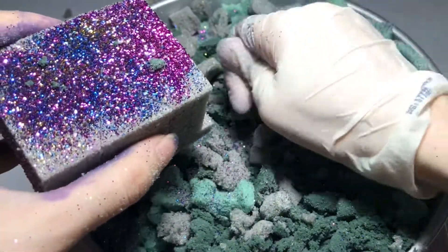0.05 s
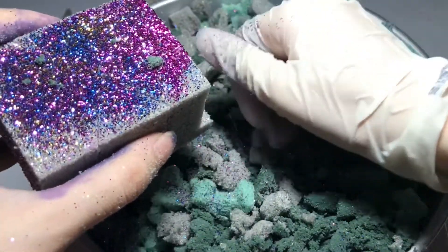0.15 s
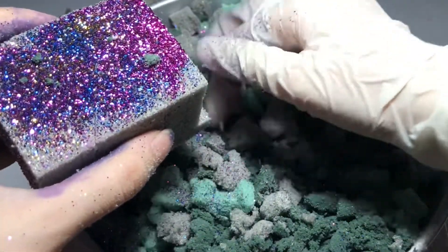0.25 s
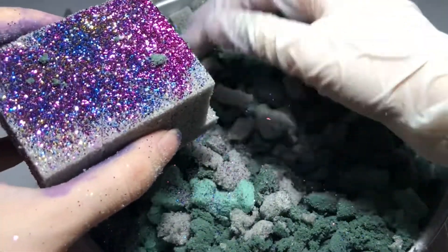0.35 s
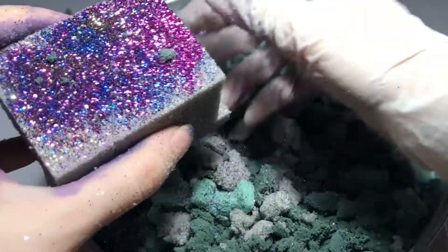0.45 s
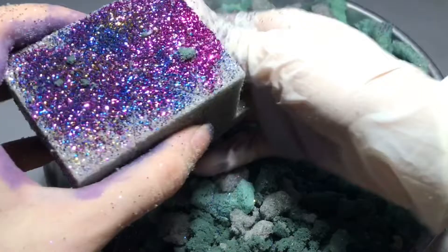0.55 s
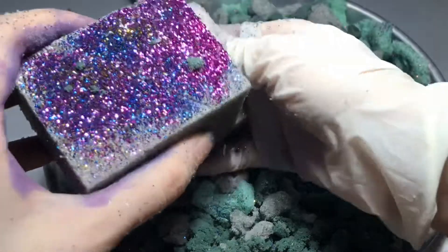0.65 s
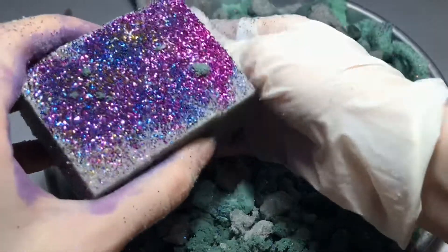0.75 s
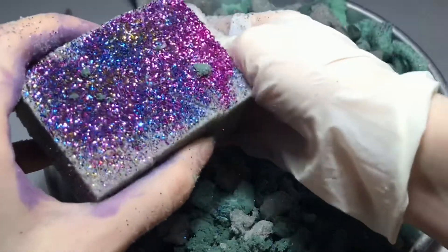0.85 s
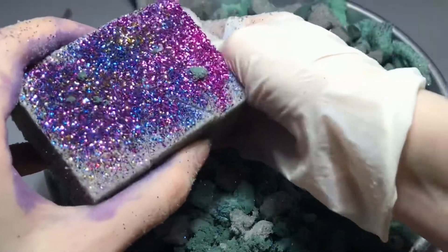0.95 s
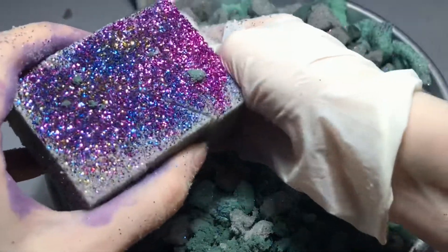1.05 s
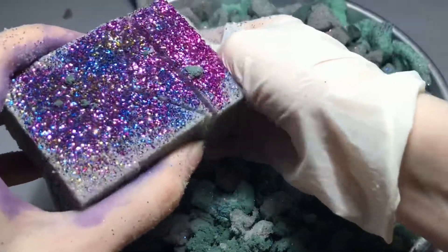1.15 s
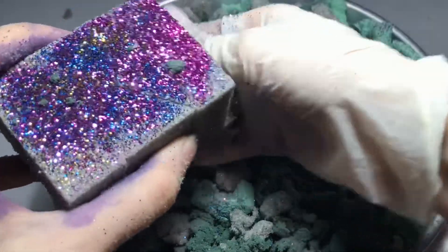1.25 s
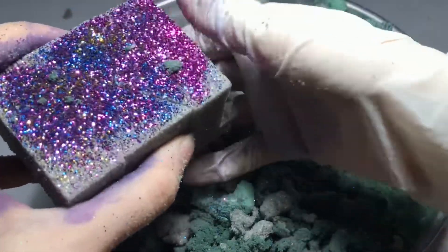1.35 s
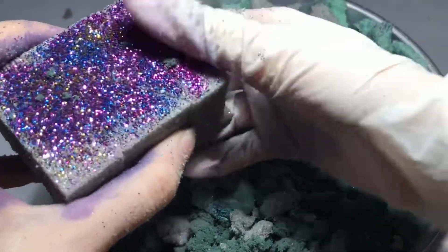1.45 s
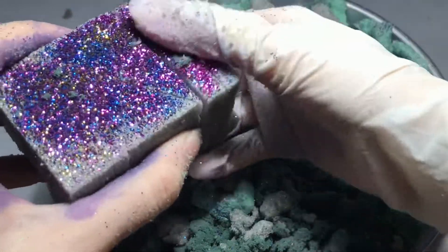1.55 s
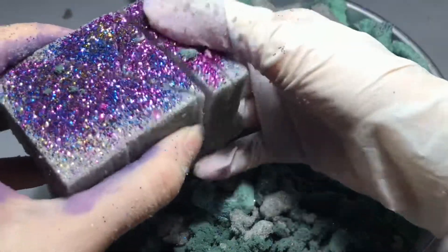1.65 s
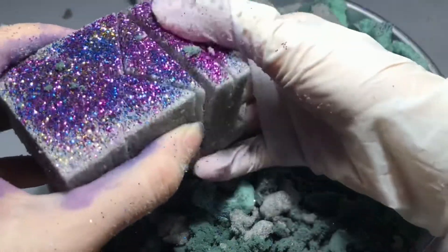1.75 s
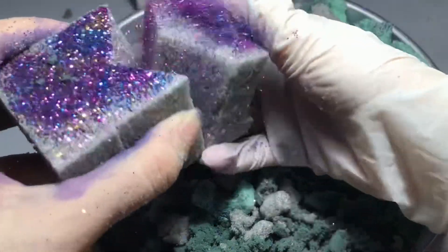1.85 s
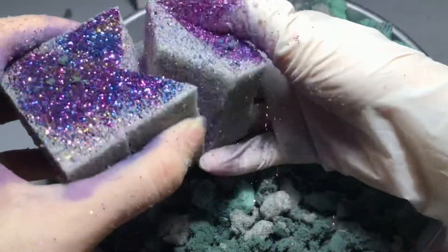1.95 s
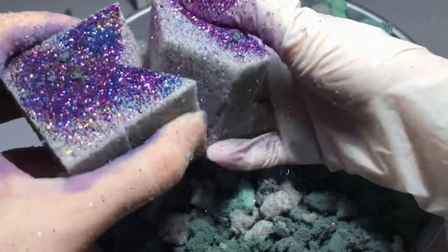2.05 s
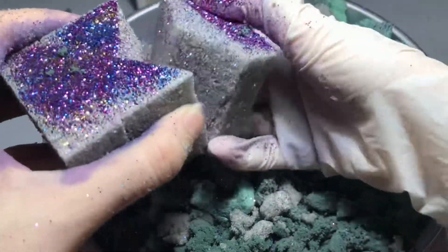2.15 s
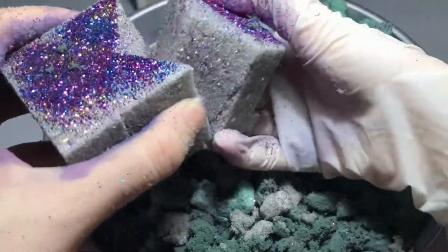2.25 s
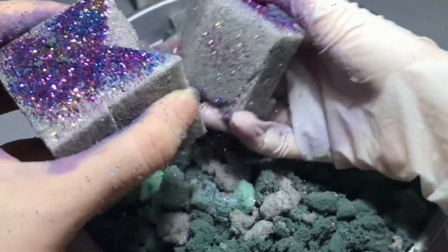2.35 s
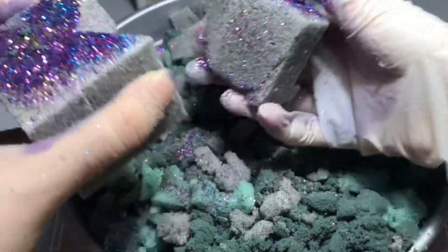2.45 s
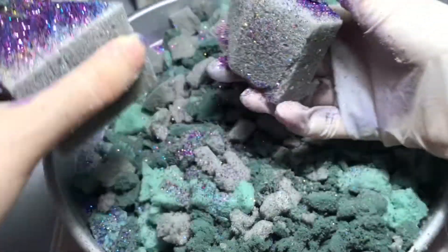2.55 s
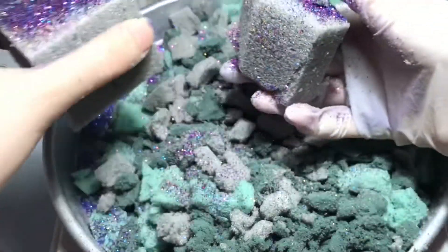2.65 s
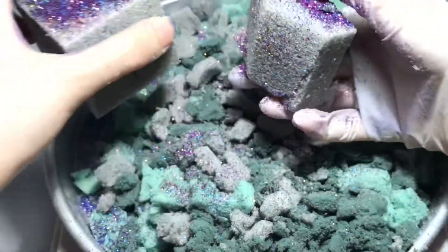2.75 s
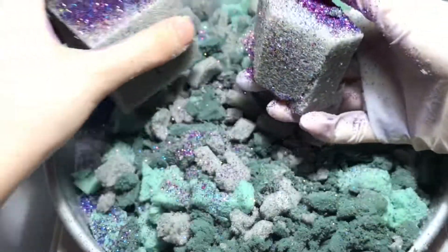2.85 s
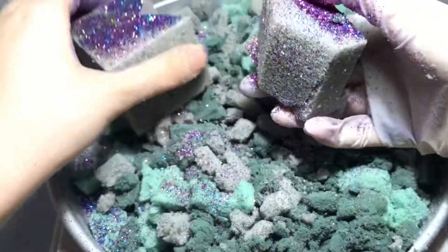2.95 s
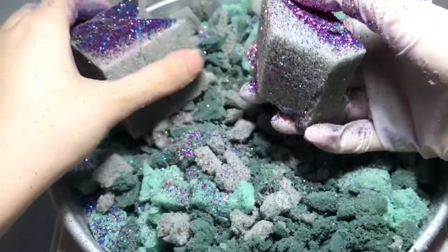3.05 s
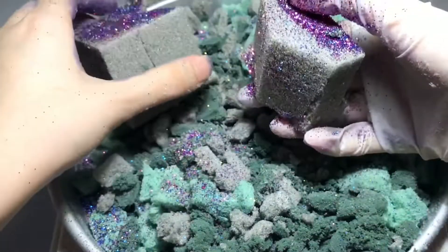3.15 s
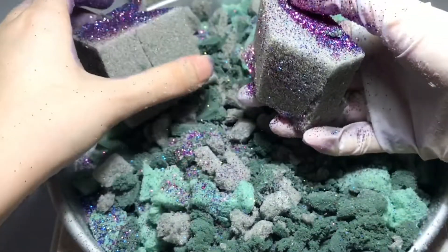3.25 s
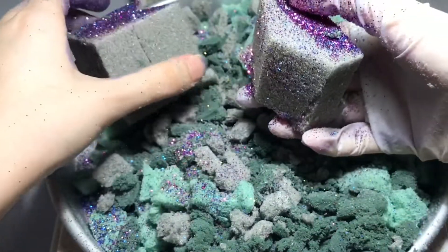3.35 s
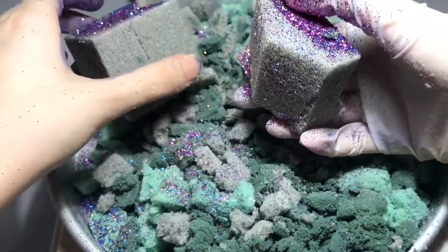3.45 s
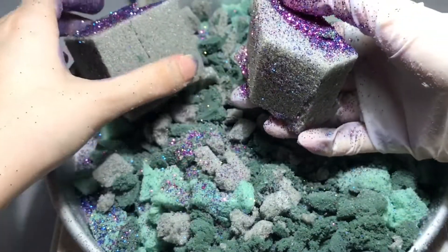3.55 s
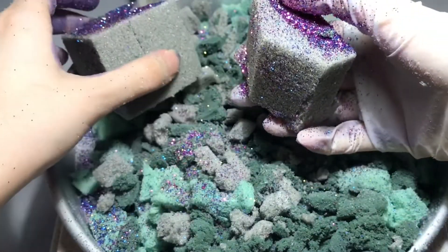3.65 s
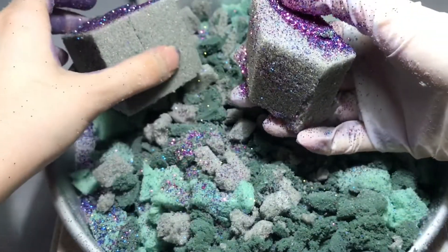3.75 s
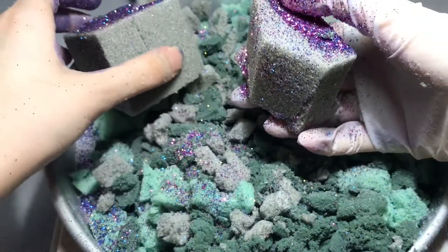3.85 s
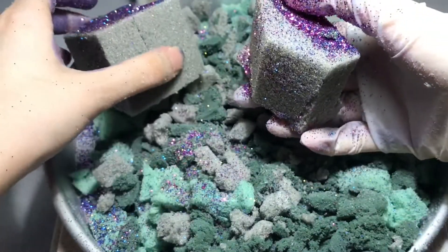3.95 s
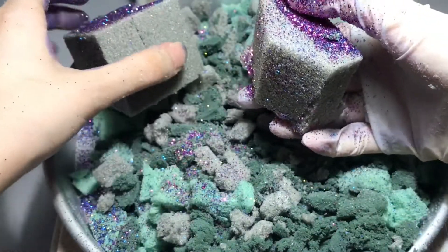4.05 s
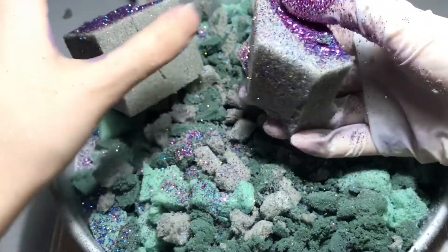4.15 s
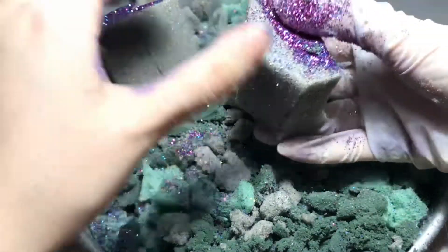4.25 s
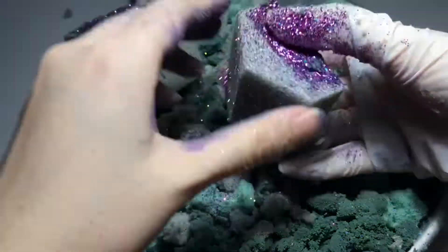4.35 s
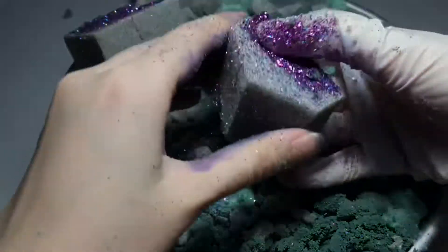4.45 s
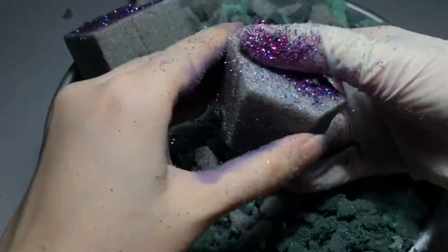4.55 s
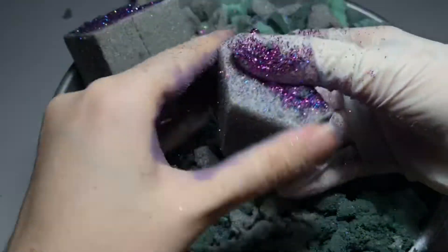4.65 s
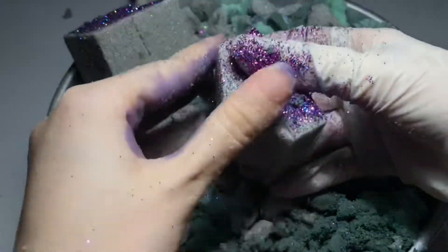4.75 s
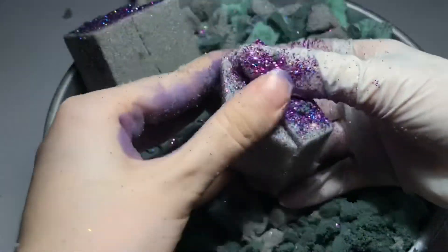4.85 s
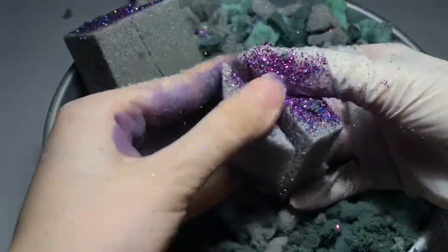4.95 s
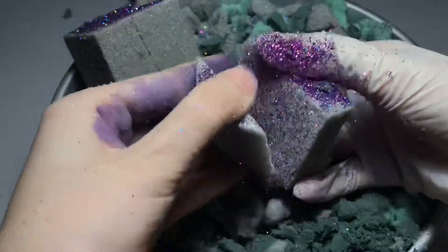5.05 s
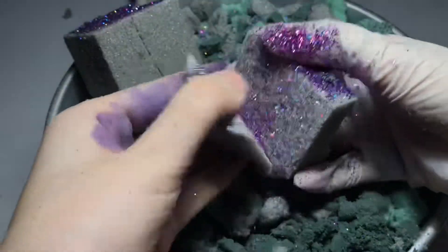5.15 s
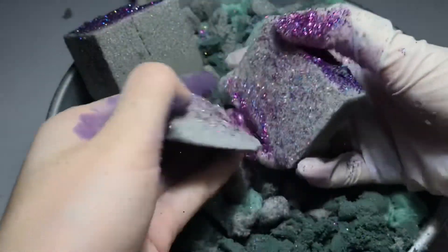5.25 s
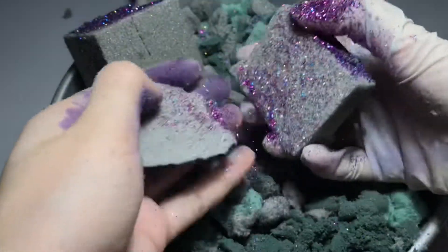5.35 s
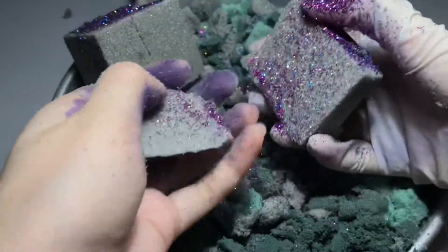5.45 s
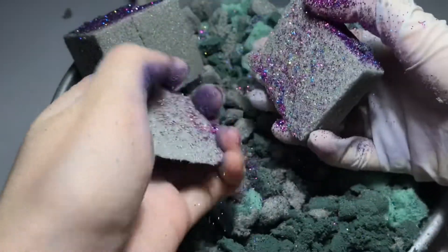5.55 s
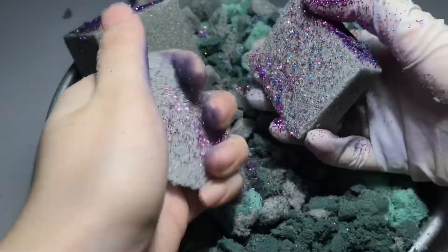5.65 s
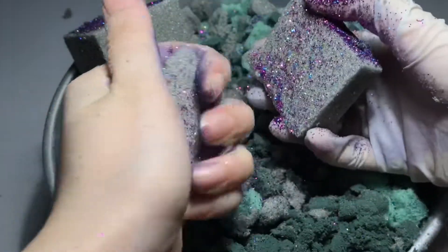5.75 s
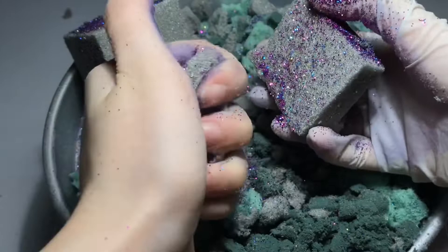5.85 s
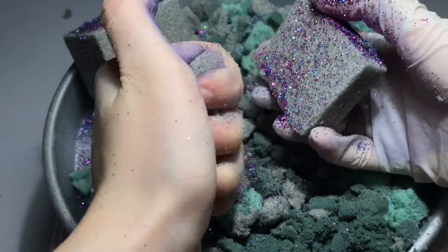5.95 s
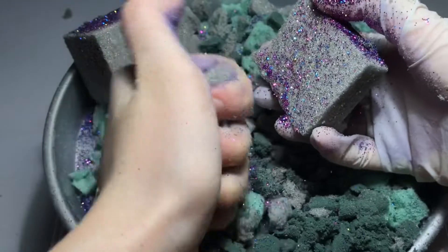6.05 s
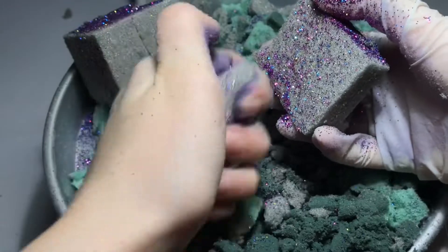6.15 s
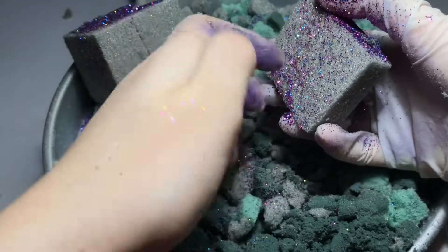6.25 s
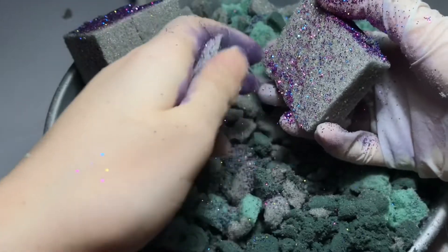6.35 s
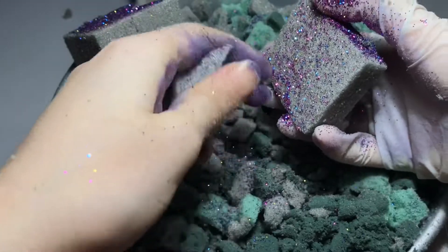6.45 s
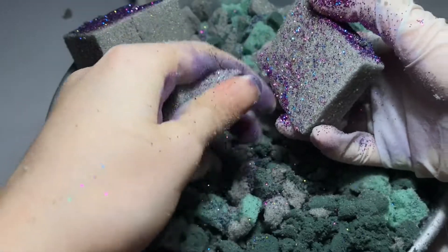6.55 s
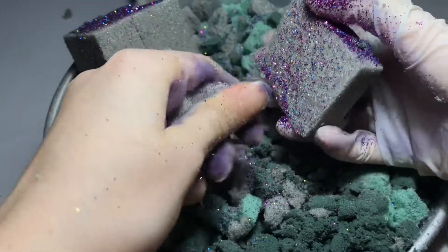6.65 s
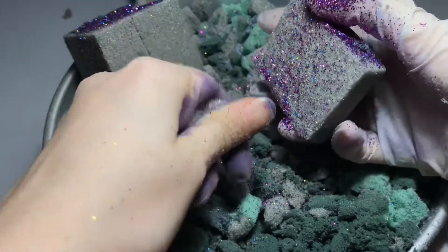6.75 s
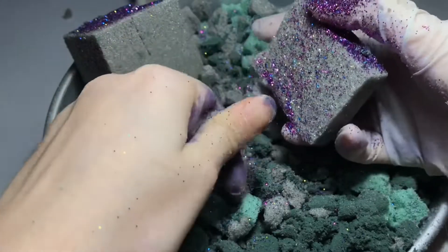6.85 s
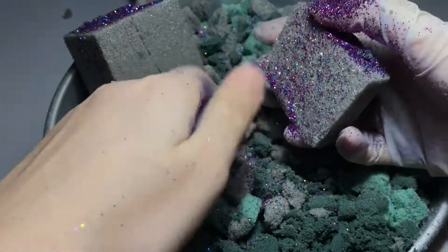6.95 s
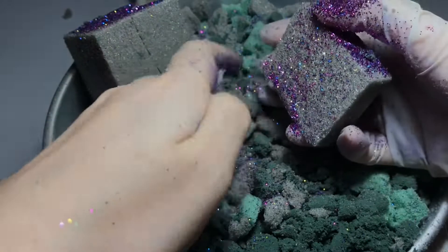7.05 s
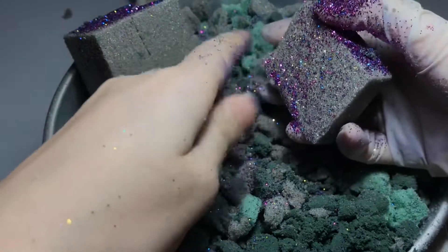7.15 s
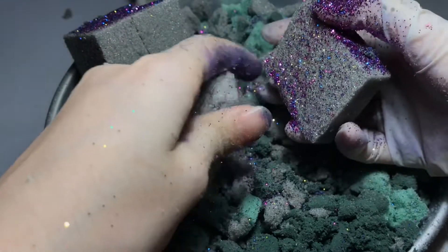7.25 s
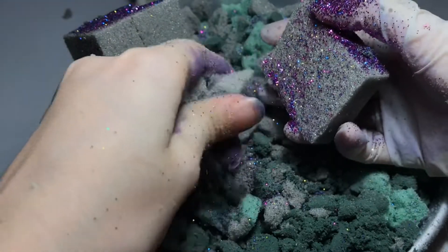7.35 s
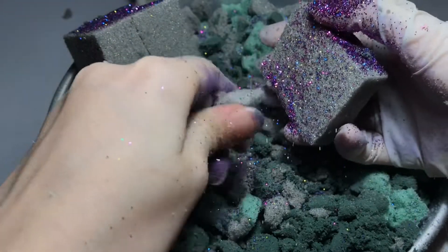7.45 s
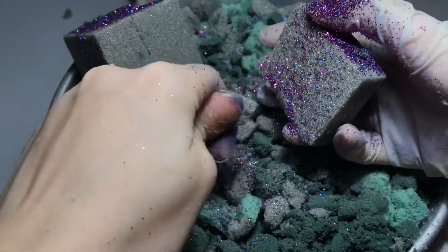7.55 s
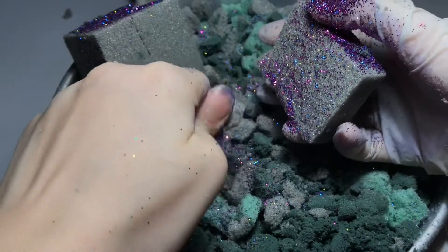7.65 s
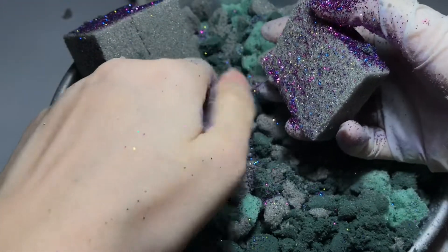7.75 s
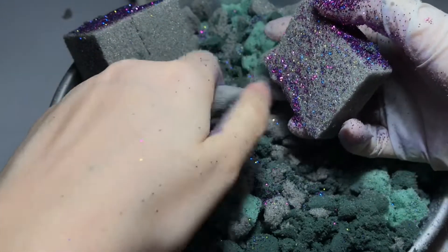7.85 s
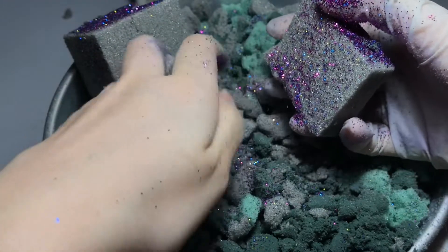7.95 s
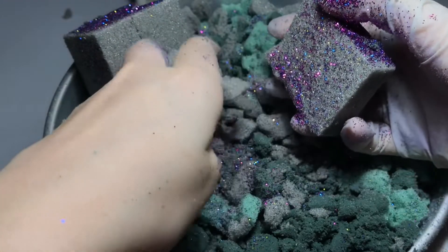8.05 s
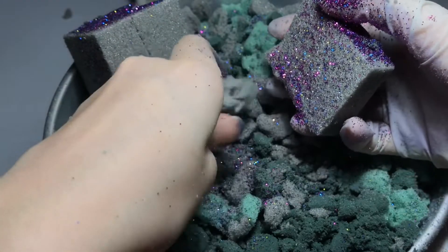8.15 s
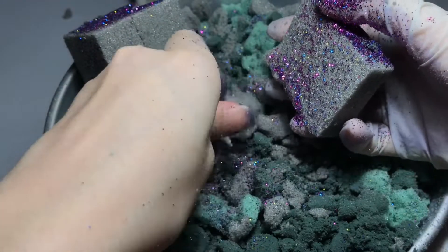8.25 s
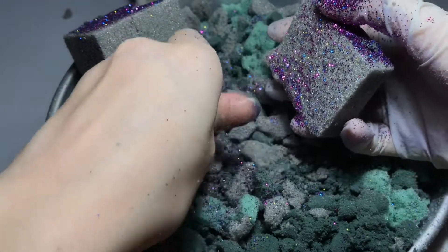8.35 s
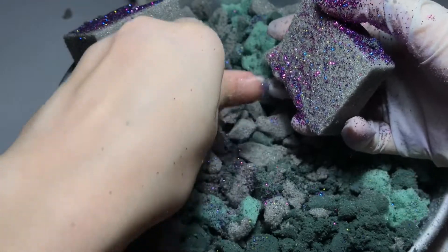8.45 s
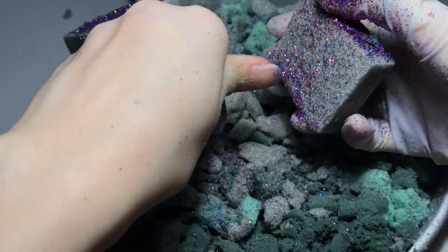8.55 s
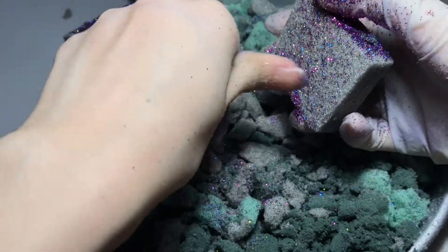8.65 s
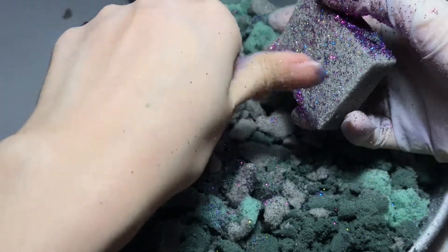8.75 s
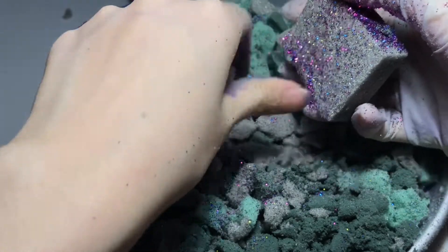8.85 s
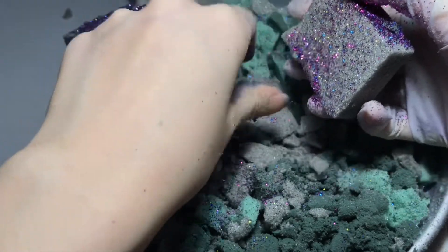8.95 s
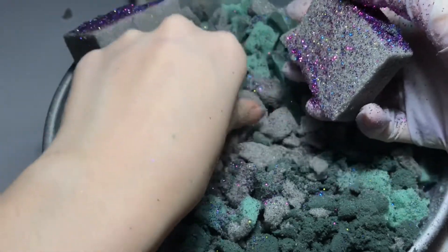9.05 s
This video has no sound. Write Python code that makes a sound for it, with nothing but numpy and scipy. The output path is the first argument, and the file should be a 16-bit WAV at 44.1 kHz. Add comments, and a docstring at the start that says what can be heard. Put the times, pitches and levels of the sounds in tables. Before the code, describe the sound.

Dry brittle foam block snaps and crumbles in the hands, sharp crunchy cracks and gritty fizzing squeezes heard very close in a quiet room.

```python
"""Blocks of dry floral foam break and crumble under the hands, close to the microphone in a quiet room.
Brittle cell walls burst as thousands of short ringing clicks that merge into a crunchy hiss under each squeeze.
Cracks tear through the block as swelling bursts of the same grains; ribs snap as sharp ticks of noise.
Scrapes sing as resonant noise and loose crumbs tick in the bowl, with a soft low knock as a block is put down.
Low rumble, two wavering hums and a faint hiss, all filtered noise, fill the room."""
import sys
import numpy as np
from scipy import signal
from scipy.fft import rfft, irfft
from scipy.io import wavfile

SR = 44100
rng = np.random.default_rng(int(sys.argv[2]) if len(sys.argv) > 2 else 0)


def bounce(signal):
    """Save signal as a 16-bit WAV file at the path given by the first command-line argument."""
    frames = np.transpose(np.atleast_2d(signal))
    limited = np.clip(frames, -1, 1)
    pcm = np.round(limited * 32767).astype(np.int16)
    wavfile.write(sys.argv[1], SR, pcm)


N = 400869   # length in samples
SPLIT_HZ = 5380   # border between coarse and fine grains


def from_db(db):
    """Decibels to gain."""
    return 10 ** (np.asarray(db) / 20)


def rms_one(x):
    """Scales to rms 1."""
    return x / np.sqrt(np.mean(x ** 2) + 1e-20)


def drift(rate_hz):
    """Slow random wander with rms 1: noise through a two-pole lowpass."""
    r = np.exp(-2 * np.pi * rate_hz / SR)
    wander = signal.lfilter([1], [1, -2 * r, r * r], rng.standard_normal(N + SR))
    return rms_one(wander[SR:])   # the first second lets the filter settle


def resonance(x, hz, width_hz):
    """Two-pole resonance, gain 1 on top."""
    r = np.exp(-np.pi * width_hz / SR)
    feedback = [1, -2 * r * np.cos(2 * np.pi * hz / SR), r * r]
    return signal.lfilter([(1 - r * r) / 2, 0, (r * r - 1) / 2], feedback, x)


def split(x):
    """Coarse (low) and fine (high) part, which add up to the whole."""
    coarse = signal.sosfilt(signal.butter(2, SPLIT_HZ, fs=SR, output="sos"), x)
    return coarse, x - coarse


def colour(x, spectrum):
    """Minimum-phase filter with the shape of the spectrum; white noise of rms 1 stays at rms 1."""
    size = 2 ** 14
    hz, db = np.transpose(spectrum)
    bins_hz = np.fft.rfftfreq(size, 1 / SR)
    log_gain = np.log(from_db(np.interp(np.log(bins_hz + 1), np.log(hz), db)))
    # folding the cepstrum forward in time gives minimum phase
    cepstrum = irfft(log_gain)
    cepstrum[1:size // 2] *= 2
    cepstrum[size // 2 + 1:] = 0
    response = irfft(np.exp(rfft(cepstrum)))
    return signal.fftconvolve(x, response / np.sqrt(np.sum(response ** 2)))[:N]


def cells(uneven_db, clump_db, patch_db, pitches=22):
    """Cell walls burst at random, in clumps; each click rings briefly at one of a set of pitches."""
    cells_per_s, sharpness = 14000, 4.8   # sharpness: pitch over bandwidth
    strengths = from_db(uneven_db * np.minimum(rng.exponential(1, N), 5)) * rng.choice([-1, 1], N)
    bursts = rng.random(N) < cells_per_s / SR
    clicks = strengths * bursts * from_db(clump_db * drift(73))
    dealt = rng.integers(0, pitches, N)
    out = np.zeros(N)
    for k, hz in enumerate(np.geomspace(700, 15000, pitches)):
        # each pitch has busy and idle moments of its own
        activity = from_db(patch_db * drift(24) + 1.6 * drift(4.0))
        out += activity * resonance(clicks * (dealt == k) + 1e-18, hz, hz / sharpness)
    return split(rms_one(out))


# fingers resting on and shifting the foam, fine-grain level joined by straight lines: start_s, level_db
FINGER_CONTACT = [(0.0, -47.5), (0.5, -64), (0.56, -47), (1.65, -48), (1.9, -51.5), (2.1, -57.5),
                  (2.53, -54), (2.75, -66), (3.3, -70), (4.07, -66.5), (4.15, -55), (4.3, -65.5),
                  (4.42, -54), (5.1, -49), (5.3, -64.5), (6.06, -85), (7.0, -49), (7.8, -55), (8.02, -50),
                  (8.72, -51), (8.8, -67.5), (8.99, -78.5), (9.09, -57)]
# each squeeze builds, holds and lets go, coarse_db is coarse grains against fine:
# full_pressure_s, hold_s, level_db, build_s, let_go_s, coarse_db
SQUEEZES = [(0.0, 0.24, -53.5, .05, 0.034, 7.5), (0.542, 0, -53, 0.016, 0.36, 15.5),
            (.92, 0.052, -39.5, 0.38, 0.13, 4), (1.687, 0.0075, -27.5, 0.041, 0.021, -3),
            (1.778, 0.093, -42.5, 0.014, 0.0061, 3.5), (2.244, 0, -33, 0.13, 0.048, 3.5),
            (2.967, 0.0058, -56.5, 0.062, 0.32, 10), (3.664, 0.065, -63, 0.14, 0.42, 9),
            (4.38, 0, -53.5, 0.089, 0.092, 10.5), (4.58, 0, -45.5, 0.34, 0.057, 8.5),
            (4.71, 0.0022, -41.5, 0.046, 0.088, 5.5), (4.963, 0.068, -23.5, 0.013, 0.01, -3),
            (5.183, 0.011, -30.5, 0.033, 0.059, 4.5), (5.322, 0.16, -41, 0.033, 1, 2),
            (5.777, 0.14, -28.5, 0.42, 0.098, -1), (6.149, 0.17, -44.5, 0.047, .1, 4.5),
            (6.432, 0.21, -29, 0.1, 0.15, -4), (6.734, 0.22, -42.5, 0.038, 0.022, 2.5),
            (7.274, 0.23, -31.5, 0.24, 0.093, -14), (7.7, 0, -45.5, 0.4, 0.32, -3),
            (8.12, 0.35, -37, 0.12, 0.35, -13)]


def pressure():
    """Gains of coarse and fine grains: light contact plus every squeeze, added in power."""
    contact_coarse_db = 4
    ramp_db = 20   # level covered in one build-up or let-go time
    t = np.arange(0, N + 64, 64) / SR
    fine = from_db(np.interp(t, *np.transpose(FINGER_CONTACT))) ** 2
    coarse = fine * from_db(contact_coarse_db) ** 2
    for s, hold, level_db, build, let_go, coarse_db in SQUEEZES:
        ramps = np.maximum(s - t, 0) / build + np.maximum(t - s - hold, 0) / let_go
        power = from_db(level_db - ramp_db * ramps) ** 2
        fine = fine + power
        coarse = coarse + power * from_db(coarse_db) ** 2
    return [np.interp(np.arange(N) / SR, t, np.sqrt(p)) for p in (coarse, fine)]


def crumbs(per_s=60, spread_db=3, length_s=0.004):
    """Small crumbs give way at random: sudden gain bumps that die in a few milliseconds."""
    sizes = from_db(spread_db * np.minimum(rng.exponential(1, N), 3))
    starts = (rng.random(N) < per_s / SR) * sizes
    return signal.lfilter([1], [1, -np.exp(-1 / (length_s * SR))], starts)


def crush(coarse_gain, fine_gain):
    """The crunchy hiss: bursting cells follow the pressure, roughened by crumbs."""
    coarse, fine = cells(uneven_db=-3.0, clump_db=0.5, patch_db=1.5)
    return (0.8 + 0.35 * crumbs()) * (fine * fine_gain + coarse * coarse_gain)


# a crack runs or a crumb is ground, levels before the foam's colour: start_s, top_db, rise_s, t60_s
TEARS = [(0.084, -38.5, 0.0095, 0.13), (0.53, -41, 0.0056, .6), (.66, -36.5, 0.013, 0.042),
         (1.55, -38.5, 0.014, 0.31), (1.658, -27.5, 0.0083, 0.12), (1.70, -26.5, .0041, 0.055),
         (1.783, -8, 0.0086, .12), (1.799, -8, 0.012, 0.06), (1.848, -39, 0.005, .019),
         (2.214, -29.5, 0.011, 0.26), (2.266, -18.5, .014, 0.044), (2.386, -44, 0.0038, 0.036),
         (2.415, -40.5, 0.0052, 0.069), (2.44, -43, 0.0065, 0.066), (2.919, -46.5, 0.0065, 0.84),
         (3.095, -55.5, 0.0043, 0.076), (3.63, -53.5, 0.031, 0.09), (4.345, -38.5, 0.0098, 0.09),
         (4.371, -30, 0.012, 0.08), (4.574, -30.5, 0.019, 0.084), (4.69, -36.5, 0.027, 0.049),
         (4.848, -42.5, 0.0039, 0.43), (4.956, -12.5, 0.0026, 0.14), (4.975, -13, 0.0019, 0.13),
         (5.134, -31.5, 0.0022, 0.4), (5.179, -17, 0.012, 0.022), (5.259, -30, 0.016, 0.029),
         (5.536, -29, 0.017, 0.068), (5.628, -27.5, 0.0044, 0.07), (5.652, -26, .014, .06),
         (5.748, -18, 0.0046, 0.046), (5.786, -18.5, 0.0047, 0.072), (5.878, -19.5, 0.003, 0.03),
         (6.289, -35, 0.007, 0.068), (6.374, -20, 0.002, 0.11), (7.098, -35, 0.0093, 0.23),
         (7.158, -28.5, 0.0034, 0.16), (7.26, -27.5, 0.01, 0.99), (7.295, -18.5, 0.021, 0.088),
         (7.69, -39.5, 0.0056, 0.053), (7.884, -47, 0.0063, 0.16), (8.145, -30, .008, .05),
         (8.43, -33, 0.025, 0.14), (8.479, -29.5, 0.0065, 0.097), (8.589, -41, 0.018, 0.16),
         (9.004, -36, 0.007, 0.16), (9.055, -45, 0.01, 0.089)]


def tears():
    """Each tear swells quickly through bursting cells and dies away; faint ones sound duller."""
    out, t = np.zeros(N), np.arange(N) / SR
    coarse, fine = cells(uneven_db=3, clump_db=2, patch_db=1)
    for s, top_db, rise, t60 in TEARS:
        span = slice(int(s * SR), int((s + rise + t60) * SR))
        age = t[span] - s
        fade_db = -60 * np.maximum(age - rise, 0) / t60
        swell = from_db(top_db + fade_db) * np.clip(age / rise, 0, 1) ** 2
        coarse_db = -1.0 - 0.12 * top_db
        out[span] += swell * (fine[span] + coarse[span] * from_db(coarse_db))
    return out


# single ribs snap, levels before the foam's colour, coarse_db is the gain of the low part:
# start_s, level_db, coarse_db
RIB_SNAPS = [(0.4057, -37.5, 12.5), (1.0197, -22.5, -4), (1.1016, -30, -4), (1.1341, -29.0, -2.0),
             (1.1516, -20, -5), (1.671, -11, -2.0), (1.6741, -3.5, -3), (1.6878, -10, 8.5),
             (1.6924, -4, -5), (1.7085, -13, -1), (1.7317, -23, 2.0), (1.7447, -29.5, 5.0),
             (1.7895, -2.5, 10.5), (1.8112, 2, 9), (1.8545, -12, -1.0), (1.8577, -14, -1.0),
             (1.961, -26, 3), (1.9659, -17, 0.0), (2.0064, -26, 2), (2.0201, -17.5, 3), (2.0249, -30, 2.0),
             (2.0429, -24, 2.0), (2.0526, -28, 4.0), (2.0606, -31.0, 2.0), (2.0676, -29, -4.0),
             (2.0809, -25, 5), (2.0944, -30, 3.0), (2.1038, -33.0, -2.0), (2.1112, -21, 3.0),
             (2.1182, -22.0, 0.0), (2.129, -26.0, 5), (2.144, -18.5, -3.0), (2.1611, -20, 5),
             (2.1645, -17, 0.0), (2.1798, -24, 3), (2.1871, -21.0, 3), (2.1949, -10.5, 2),
             (2.2088, -17, -1.0), (2.2202, -12.5, -3.0), (2.2246, -16, -1), (2.2344, -16.0, 1),
             (2.2536, -16, -7.0), (2.2638, -18, -2), (2.268, -15.0, 7), (2.271, -12, 8), (2.2782, -15, 11),
             (2.2844, -11, 8), (2.4218, -30.0, -2), (4.3778, -20.0, 6), (4.94, -22, 1), (4.9477, -26, 2),
             (4.9599, -0.5, 4.5), (4.9774, -0.5, -2.0), (4.9805, 1.5, 0), (4.9881, 0.5, 8), (4.9995, -5, 1),
             (5.0289, -11, 0), (5.04, -18, 3), (5.1307, -21, 3), (5.1374, -19, 1), (5.1687, -17.0, -6.0),
             (5.1917, -8, 2), (5.4015, -17.5, -13.0), (5.4322, -19.0, -1), (5.7226, -6, 2),
             (5.7539, -10, 16.5), (5.7591, -9, 7), (5.7718, -14, 12.0), (5.7987, -9.5, 11),
             (5.8091, -12, -4.0), (5.8216, -10, 4), (5.8432, -9.5, 6), (5.884, -3.5, 1),
             (5.9034, -15, -3.0), (5.94, -9.0, 4.5), (5.9756, -18, 6), (6.2457, -22, 4),
             (6.3761, -11.0, 0.0), (6.3799, -16, -2), (6.3879, -12, -2), (6.4239, -15.5, -6.0),
             (6.4954, -17, -3), (6.5163, -14, 0.0), (6.5661, -15, 11.5), (6.6375, -8, -17),
             (6.6494, -12, -9), (6.6526, -13, -7), (6.6672, -16.0, -13), (7.4651, -19, -9),
             (7.4779, -19, -14), (7.5002, -24, -7.0), (7.5429, -17.5, 0.5), (7.7033, -25.5, -9),
             (8.4664, -25, -1)]


def splinters(gain, count=1350):
    """Small ribs give way at random; their rows rise and fall a little more steeply than the crush."""
    per_s, level_db, follows, uneven_db = 130, -24, 1.2, 3   # base level is for a crush gain of -30 dB
    chance = rng.random((count, 3))
    s = np.cumsum(-np.log(1 - chance[:, 0])) / per_s
    keep = s < (N - 1) / SR
    s, chance = s[keep], chance[keep]
    crush_db = 20 * np.log10(gain[(s * SR).astype(int)])
    extra_db = uneven_db * np.minimum(-np.log(1 - chance[:, 1]), 2)
    snap_db = level_db + follows * (crush_db + 30) + extra_db
    return np.c_[s, snap_db, -10 * chance[:, 2]]


def snaps(ribs, rise_s=.00005, crack_s=.00017, tail_s=.002, tail_db=-17):
    """A sharp, short burst of noise with a faint crumbling tail; thin ribs give little bass."""
    length = 800   # samples
    out, age = np.zeros(N + length), np.arange(length) / SR
    decay = np.exp(-age / crack_s) + from_db(tail_db) * np.exp(-age / tail_s)
    shape = (1 - np.exp(-age / rise_s)) ** 2 * decay
    rib_hz = 3500 * 2 ** rng.uniform(0, 2.0, len(ribs))   # every rib favours a pitch of its own
    cracks = rng.standard_normal((len(ribs), length)) * shape
    ringing = np.array([resonance(c, hz, hz / 3.5) for c, hz in zip(cracks, rib_hz)])
    coarse, fine = split(cracks + 0.6 * ringing)
    cracks = fine + coarse * from_db(ribs[:, 2:])
    # levels are set on the first instants, counting the low part 7 dB weaker since the foam damps it
    audible = fine + coarse * from_db(ribs[:, 2:] - 7)
    cracks = cracks / np.sqrt(np.mean(audible[:, 2:14] ** 2, axis=1, keepdims=True))
    for (s, level_db, _), crack in zip(ribs, cracks):
        i = max(int(s * SR) - 8, 0)   # start slightly early, to leave room for the rise
        out[i:i + length] += from_db(level_db) * crack
    return signal.sosfilt(signal.butter(1, [900, 15000], "band", fs=SR, output="sos"), out[:N])


# tone of the foam, relative spectrum: pitch_hz, density_db (per Hz)
FOAM_COLOUR = [(150, -56), (250, -21.5), (484, -27.5), (1080, -12.5), (1180, -15.5), (1760, -15),
               (2090, -8), (2960, -8), (3170, -11), (4260, -7), (5930, -2.5), (9600, -2), (10300, -6.5),
               (11000, -2), (13400, 0), (16000, 2)]
# the block's body resonance, one row, level against the direct grains: pitch_hz, width_hz, level_db
BODY_RESONANCE = (3250, 200, 4.5)


def block(x):
    """The foam colours every grain and adds one body resonance."""
    hz, width, level_db = BODY_RESONANCE
    return colour(x + from_db(level_db) * resonance(x, hz, width), FOAM_COLOUR)


def thump(cracks):
    """Cracks jolt the whole block: a dull low knock, squared so that big ones dominate."""
    hz, width_hz, level_db = 407, 440, -25.5
    knock = resonance(resonance(cracks ** 2, hz, width_hz), hz, width_hz)
    return from_db(level_db) * knock


# skin or glove drags over the foam and a hollow sings, levels before the fades:
# start_s, end_s, pitch_hz, width_hz, level_db
SCRAPES = [(.0, 0.138, 1980, 900, -54), (0.14, 0.272, 1020, 500, -60.5), (0.524, 0.726, 2560, 910, -56),
           (0.517, 0.626, 1340, 705, -53), (0.71, 1.03, 3450, 900, -50.5), (0.847, 1.056, 1960, 510, -50.5),
           (1.15, 1.305, 2580, 1230, -53.5), (1.387, 1.5, 3140, 500, -56.5), (5.31, 5.38, 3450, 250, -50),
           (5.306, 5.5, 6100, 1500, -45.5), (5.362, 5.418, 1120, 497, -51.5),
           (5.616, 5.71, 1030, 250, -47.5), (5.697, 5.912, 1090, 900, -54),
           (5.689, 5.806, 3330, 1200, -33.5), (6.37, 6.397, 1030, 250, -50.5),
           (7.06, 7.36, 1030, 497, -58.5), (8.014, 8.53, 2670, 600, -52.5), (8.457, 8.509, 3520, 900, -41),
           (8.585, 8.619, 2730, 1810, -43), (8.666, 8.747, 2440, 694, -55)]


def scrapes():
    """Gritty friction noise through two resonances at one pitch, swelling and fading."""
    out = np.zeros(N)
    friction = rng.standard_normal(N) * from_db(3.5 * drift(200))
    for start, end, hz, width, level_db in SCRAPES:
        span = slice(int(start * SR), int(end * SR))
        sung = resonance(resonance(friction[span], hz, width), hz, 3.3 * width)
        out[span] += from_db(level_db) * rms_one(sung) * signal.windows.tukey(len(sung), .6)
    return out


# the block is put down softly on the crumbs, one row: start_s, pitch_hz, t60_s, level_db
SET_DOWN = (3.0, 212, 0.33, -44)


def set_down():
    """A soft low knock: a decaying sine with a 13 ms rise."""
    s, hz, t60, level_db = SET_DOWN
    age = np.maximum(np.arange(N) / SR - s, 0)
    envelope = from_db(level_db - 60 * age / t60) * np.minimum(age / 0.013, 1)
    return envelope * np.sin(2 * np.pi * hz * age)


def settling(per_s=24, level_db=-59):
    """Loose crumbs in the bowl shift with faint dry ticks: 2 ms puffs of noise, fine part only."""
    sizes = from_db(level_db + 3.1 * np.minimum(rng.exponential(1, N), 3))
    starts = (rng.random(N) < per_s / SR) * sizes
    envelope = np.convolve(starts, signal.windows.hann(90))[:N]
    return split(envelope * rng.standard_normal(N))[1]


# the room's rumble, relative spectrum: pitch_hz, density_db (per Hz)
RUMBLE_COLOUR = [(15, -36), (33, -23.5), (48, -7), (63, 0.5), (73, -0.5), (83, -14.5), (98, -3), (112, -21),
                 (140, -13.5), (155, -18.5), (212, -22.5), (232, -28), (255, -20), (290, -23.5),
                 (450, -34.5), (900, -60)]


def rumble(level_db=-50):
    """Low filtered noise whose level wanders slightly."""
    gain = from_db(level_db + 0.89 * drift(1.1))
    return gain * colour(rng.standard_normal(N), RUMBLE_COLOUR)


# faint wavering hums: pitch_hz, width_hz, level_db
HUMS = [(212.6, 6.6, -70.5), (254.8, 11, -71)]


def hums():
    """Noise through narrow resonances, heard as tones in the rumble."""
    out = np.zeros(N)
    for hz, width, level_db in HUMS:
        out += from_db(level_db) * rms_one(resonance(rng.standard_normal(N), hz, width))
    return out


# background hiss, relative spectrum: pitch_hz, density_db
HISS_COLOUR = [(240, -29.5), (400, -1), (742, 0), (1400, 0), (3470, -10.5), (5030, -14.5), (14800, -25),
               (16000, -21)]


def hiss(level_db=-63.5):
    """Steady filtered noise."""
    return from_db(level_db) * colour(rng.standard_normal(N), HISS_COLOUR)


def scene():
    """Crush, cracks and crumbs through the block, thumps, scrapes and a knock beside it, over the room."""
    coarse_gain, fine_gain = pressure()
    crushed = crush(coarse_gain, fine_gain)
    cracks = tears() + snaps(np.r_[RIB_SNAPS, splinters(fine_gain)])
    foam = block(crushed + cracks + settling())
    handling = thump(cracks) + scrapes() + set_down()
    room = rumble() + hums() + hiss()
    return (foam + handling + room)[None]


def record(dry):
    """Peaks clip at 1.2 times full scale, then a steep lowpass cuts the top."""
    lowpass = signal.ellip(10, .1, 50, 15750, fs=SR, output="sos")   # ripple dB, stopband dB, cutoff Hz
    return signal.sosfilt(lowpass, np.clip(dry, -1.2, 1.2))


dry = scene()
out = record(dry)
bounce(out)
```